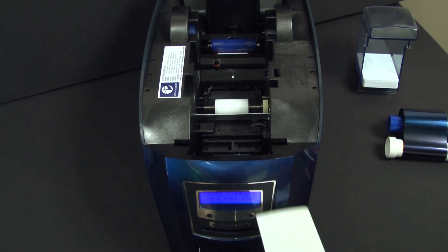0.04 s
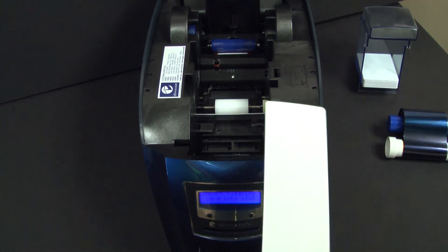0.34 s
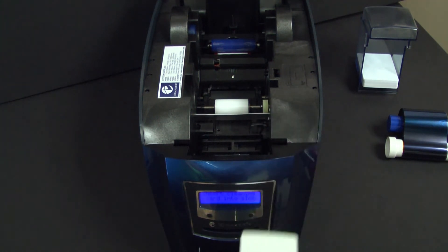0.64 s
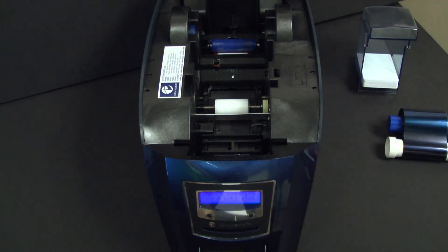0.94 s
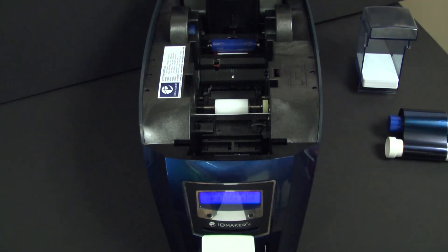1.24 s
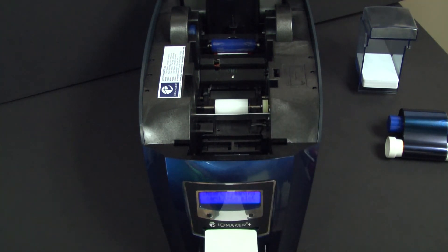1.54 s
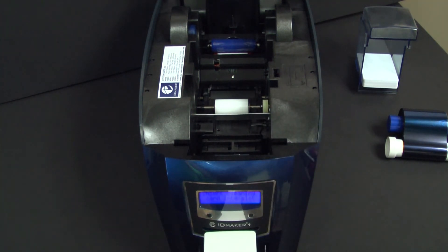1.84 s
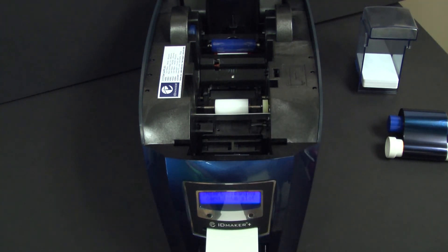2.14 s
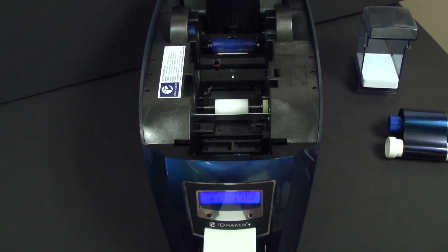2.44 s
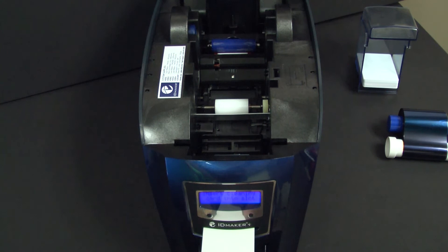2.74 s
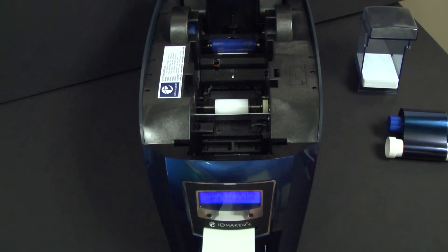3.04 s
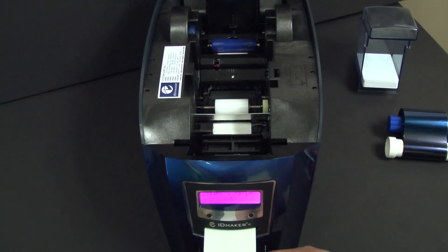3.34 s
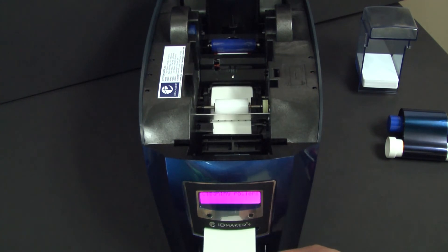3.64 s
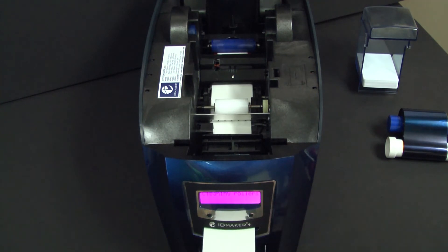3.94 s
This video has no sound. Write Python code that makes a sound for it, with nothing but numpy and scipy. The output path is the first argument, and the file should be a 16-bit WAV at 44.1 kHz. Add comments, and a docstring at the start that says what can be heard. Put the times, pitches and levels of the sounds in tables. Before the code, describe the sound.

A card printer's motor whines steadily with ticking gears, then pulls a card through.

```python
"""A steady whine sounds over a soft rattle and tick: a card printer, close by, indoors, its lid open.
The whine comes from its stepper motor, which turns in tiny quick steps; the rattle and ticks come
from plastic gears. After three seconds the rollers catch a card: it hisses along the guides,
rubs on the rubber and knocks through."""
import sys
import numpy as np
from scipy import signal
from scipy.fft import rfft, irfft
from scipy.io import wavfile
from scipy.ndimage import uniform_filter1d

SR = 44100
rng = np.random.default_rng(int(sys.argv[2]) if len(sys.argv) > 2 else 0)


def waveform_to_disk(signal):
    """Save audio, clipped to [-1, 1], as 16-bit WAV at the path in sys.argv[1]."""
    frames = np.transpose(np.atleast_2d(signal))
    scaled = np.clip(frames, -1, 1) * 32767
    samples = np.round(scaled).astype(np.int16)
    wavfile.write(sys.argv[1], SR, samples)


N = 176400
T = np.arange(N) / SR

DRIVE_HZ, CYCLES_PER_TURN = 327.33, 50  # the motor's drive cycles: per second, per turn of its rotor
ROTOR_HZ, ROLLER_HZ = DRIVE_HZ / CYCLES_PER_TURN, 3.43  # turns per second
# dip shared by three high overtones as the card enters (t/s, change/dB)
ENTRY_DIP = [(3.06, 0), (3.18, -5), (3.6, 0)]


def motor():
    """The stepping motor sings at multiples of its drive rate: returns a loud whine and a faint buzz."""
    # the two loud tones, at 4 and 8 times the drive rate (t/s, level/dB)
    low_whine = [(0, -49), (1.2, -47.5), (2.4, -47), (3.15, -46.5), (3.48, -48), (3.52, -50.5),
                 (3.7, -48.5), (4, -51.5)]
    high_whine = [(0, -44.5), (.5, -45), (1.25, -44), (2.2, -44), (3.1, -45.5), (3.49, -46), (3.53, -47.5),
                  (3.75, -47), (4, -44)]
    # the fainter overtones (multiple, level running free/dB, level pulling the card/dB)
    overtones = [(2, -65, -65), (3, -77.5, -74), (5, -75, -74), (6, -68.5, -73.5), (12, -69, -80),
                 (13, -83.5, -75), (14, -79.5, -82), (16, -70, -67), (17, -84, -89), (18, -91, -84),
                 (20, -85, -83), (23, -84.5, -84), (24, -85.5, -88), (28, -80, -79.5), (30, -89.5, -87),
                 (31, -89, -91), (34, -87.5, -86), (35, -89.5, -92), (37, -86, -91), (39, -83.5, -85),
                 (40, -83, -85), (41, -78, -77), (42, -87.5, -88), (43, -78.5, -84), (45, -88, -88),
                 (46, -88, -87), (47, -90, -89)]
    # how the strong overtones wobble (multiple, roller swing/dB, roller peak t/s,
    # swing once per rotor turn/dB, swing twice per turn/dB, rotor peak t/s, random swing/dB)
    swings = [(2, 0.5, 0.24, .5, 2.5, 0.069, 0.8), (4, 1.03, 0.28, -0.13, 0.3, 0.056, 0.48),
              (6, 0.5, .03, 0, 1.3, 0.059, 1.5), (8, 0.33, .063, 0, .5, 0.075, 0.19),
              (12, .5, 0.29, -0.2, .9, .061, 1.4), (16, 1.5, 0.23, 1.7, 2.4, 0.0059, 1.7)]
    # overtones that slowly swell and fade: multiple -> (t/s, change/dB)
    swells = {6: [(.6, -7), (1.4, 1.5)], 12: [(1.2, 1.5), (2, -2.5), (2.5, .5)], 16: [(2.1, 0), (3.2, -4.5),
              (3.45, 1)], 28: ENTRY_DIP, 41: ENTRY_DIP, 43: ENTRY_DIP, 45: [(3.05, 0), (3.33, 8),
              (3.6, -1)]}
    cycles = DRIVE_HZ * T + .0012 * drift(25)  # slightly uneven steps
    load_start_s, load_rise_s, steadying = 3, 0.46, 0.72  # pulling the card calms the wobble
    load = np.clip((T - load_start_s) / load_rise_s, 0, 1)
    wobbles = {round(k): wobble(*swing) ** (1 - steadying * load) for k, *swing in swings}

    def overtone(multiple):
        """One pure tone whose loudness wavers."""
        swell = amp(curve(swells[multiple])) if multiple in swells else 1
        waver = wobbles[multiple] if multiple in wobbles else amp(1.34 * drift(10))
        return np.sqrt(2) * swell * waver * np.sin(2 * np.pi * (multiple * cycles + rng.random()))

    whine = amp(curve(low_whine)) * overtone(4) + amp(curve(high_whine)) * overtone(8)
    buzz = np.zeros(N)
    for multiple, free_db, pulling_db in overtones:
        gain = amp(free_db) + (amp(pulling_db) - amp(free_db)) * load
        buzz += gain * overtone(round(multiple))
    return whine, buzz


def wobble(roller_db, roller_peak_s, once_db, twice_db, rotor_peak_s, random_db):
    """Loudness swings with each turn of the roller and the rotor, and a little at random."""
    rotor = 2 * np.pi * ROTOR_HZ * (T - rotor_peak_s)
    roller = 2 * np.pi * ROLLER_HZ * (T - roller_peak_s)
    turning_db = roller_db * np.cos(roller) + once_db * np.cos(rotor) + twice_db * np.cos(2 * rotor)
    return amp(turning_db + random_db * drift(14))


def card_slide():
    """The sliding card makes a grainy hiss while the rollers pulling it rumble."""
    # loudness of the hiss and of the rumble (t/s, level/dB)
    hiss_levels = [(3.055, -83), (3.08, -62.5), (3.25, -59.5), (3.46, -57.5), (3.7, -59.5), (3.85, -57.5),
                   (4, -57.5)]
    rumble_levels = [(3.05, -88), (3.3, -65), (3.39, -62), (3.42, -55.5), (3.55, -60.5), (3.61, -60.5),
                     (3.76, -66), (3.86, -56.5), (4, -57.5)]
    # tone colour of each (f/Hz, level/dB)
    hiss_colour = [(500, -17), (1500, -6.5), (2800, -3.5), (3600, -3.5), (4350, 1), (5100, -7.5),
                   (6500, -11.5), (7500, -10.5), (8100, -18), (8500, -9), (9200, -20.5), (10400, -14.5),
                   (11400, -23), (12800, -18), (15500, -24)]
    rumble_colour = [(45, -21), (110, -0.5), (180, -1.5), (300, 4.5), (420, 3.5), (540, -4.5), (740, 2.5),
                     (900, 1), (1150, -1), (1700, -2.5), (2400, -7), (4000, -25)]
    grain_gain, grains_per_s = 0.53, 900
    grains = unit(rng.standard_normal(N) * (rng.random(N) < grains_per_s / SR))
    hiss = amp(curve(hiss_levels)) * colour(rng.standard_normal(N) + grain_gain * grains, hiss_colour)
    rumble = amp(curve(rumble_levels)) * colour(rng.standard_normal(N), rumble_colour)
    return hiss + rumble


def rubber_grip(start_s=3.385, length_s=.13, from_hz=170, to_hz=108, level_db=-61, octave_db=-4):
    """Rubber rubs as it grips the card: a short, shaky tone that falls in pitch."""
    progress = np.clip((T - start_s) / length_s, 0, 1)
    hz = (from_hz + (to_hz - from_hz) * progress) * (1 + .04 * drift(60))
    phase = 2 * np.pi * np.cumsum(hz) / SR
    swell = amp(level_db) * np.sqrt(2) * np.sin(np.pi * progress ** 0.6)
    return swell * (np.sin(phase) + amp(octave_db) * np.sin(2 * phase))


def card_knocks(rise_s=0.0018):
    """The card's edge hits rollers and guides: each time a clack, a short ring and a bright click."""
    # the hits (t/s, clack level/dB, ring f/Hz, ring level/dB, click level/dB)
    hits = [(3.082, -59, 3500, -63, -60), (3.252, -58, 1020, -50, -60), (3.326, -63, 5900, -60, -57),
            (3.406, -47.5, 340, -52, -63), (3.488, -48, 1594, -43, -66), (3.494, -55, 745, -46.5, -73),
            (3.533, -52.5, 1800, -48.5, -69), (3.965, -45, 1556, -39, -48), (3.98, -46, 1740, -46, -54)]
    # tone colour of the clack and of the click (f/Hz, level/dB)
    clack_colour = [(100, -7), (350, -6), (800, 0.5), (1700, -3), (3500, -2.5), (5000, -9), (9000, -35)]
    click_colour = [(1000, -20), (4000, 2.5), (7000, -1.5), (11000, -8.5), (15500, -18)]
    out = np.zeros(N)
    ring_shape = strike(rise_s, fade_s=0.083)
    for start_s, clack_db, ring_hz, ring_db, click_db in hits:
        ring = ring_shape * np.sin(2 * np.pi * ring_hz * T[:len(ring_shape)])
        add(out, start_s, amp(clack_db) * burst(clack_colour, rise_s, fade_s=0.095))
        add(out, start_s, amp(ring_db) * ring)
        add(out, start_s, amp(click_db) * burst(click_colour, rise_s, fade_s=.09))
    return out


def gear_ticks(rebound_s=.018, boost_db=2.1):
    """Gear teeth catch, then bounce back through the gap between them, so each tick is double."""
    # the catches (t/s, level before the boost/dB, change on the rebound/dB, ring f/Hz)
    catches = [(.18, -59, -6, 1100), (.279, -52, -6, 996), (.587, -50, -11, 1960), (.79, -54, -2, 1900),
               (.894, -56, -5, 1095), (1.095, -57, 3, 1120), (1.195, -51.5, -2.5, 1080),
               (1.405, -55, -2, 1040), (1.504, -54.5, -11, 1970), (1.705, -54.5, -3, 1060),
               (1.806, -51, -4, 1970), (2.009, -54, -1, 1050), (2.112, -51.5, -1.5, 1880),
               (2.314, -54, 3, 1097), (2.417, -55, -6, 1080), (2.621, -55, -8, 1900),
               (2.928, -53, -6, 1950), (3.084, -51.5, -11, 1050), (3.251, -50.5, -15, 2950),
               (3.542, -55, 0, 990), (3.832, -56, -1, 1080)]
    out = np.zeros(N)
    for start_s, db, rebound_db, ring_hz in catches:
        add(out, start_s, amp(db) * tooth_tick(ring_hz))
        add(out, start_s + rebound_s, amp(db + rebound_db) * tooth_tick(ring_hz))
    return amp(boost_db) * out


def tooth_tick(ring_hz, ring_db=-6, chatter_db=0.5, rise_s=0.00055):
    """One plastic tooth chatters against its neighbour: a dry, uneven clack with a short ring."""
    # tone colour of the clack (f/Hz, level/dB)
    clack_colour = [(200, -14), (600, -13), (1050, 4), (1450, -3), (1900, 1), (2400, 1), (3200, 0),
                    (4300, -10.5), (5500, -14.5), (8000, -33), (15000, -35)]
    shape = strike(rise_s, fade_s=0.058)
    ring = amp(ring_db) * np.sqrt(2) * shape * np.sin(2 * np.pi * ring_hz * T[:len(shape)])
    unevenness = unit(uniform_filter1d(rng.standard_normal(len(shape)), size=70))
    chatter = unit(amp(chatter_db * unevenness))
    return chatter * burst(clack_colour, rise_s, fade_s=0.059) + ring


def gear_rattle(rattle_db=-61.5, flutter_db=0.5, random_db=2.5):
    """Running gears make a fluttering rattle and shake the case, over the low hum of the drive."""
    # tone colour of the rattle (f/Hz, level/dB)
    rattle_colour = [(30, 4), (48, -2), (70, 4), (100, -3.5), (200, -2.5), (290, 0.5), (460, -0.5),
                     (520, -10.5), (590, -13), (760, 1), (900, -4.5), (1100, 0.5), (1500, -5.5),
                     (2100, -6.5), (2700, -6.5), (3400, -11.5), (3750, -13.5), (5000, -12.5), (5600, -17.5),
                     (7000, -22.5), (10000, -24), (15500, -33.5)]
    # pitches at which the case rings (f/Hz, width/Hz, level/dB)
    case_rings = [(389, 30, -70), (437, 27, -72.5), (669, 52, -68), (1299, 56, -69.5), (2620, 55, -68)]
    # steady tones of the hum; the close ones beat against each other (f/Hz, level/dB)
    hum_tones = [(118.4, -79), (392.8, -71.5), (396.3, -75), (402.3, -80.5)]
    twice_per_turn = np.cos(4 * np.pi * ROTOR_HZ * T)
    flutter = amp(flutter_db * twice_per_turn + random_db * drift(30))
    rattle = amp(rattle_db) * colour(rng.standard_normal(N) * (1 + flutter), rattle_colour)
    case = sum(amp(db) * band(hz, width) for hz, width, db in case_rings) * unit(flutter)
    hum = sum(amp(db) * np.sqrt(2) * np.sin(2 * np.pi * (hz * T + rng.random())) for hz, db in hum_tones)
    return rattle + case + hum


def airy_hiss():
    """A very faint, high hiss in the background."""
    return amp(-91.2) * band(hz=4700, width_hz=450)


def amp(db):
    """Turns decibels into a factor to multiply by."""
    return 10 ** (np.asarray(db) / 20)


def unit(x):
    """Scales a signal to an average strength (rms) of 1."""
    return x / np.sqrt(np.mean(x ** 2) + 1e-20)


def curve(points):
    """Joins (t/s, value) points with straight lines."""
    return np.interp(T, *np.transpose(points))


def add(mix, start_s, sound):
    """Adds a sound to the mix at the given time."""
    part = mix[round(start_s * SR):][:len(sound)]
    part += sound[:len(part)]


def colour(x, points):
    """Balances the lows and highs of x by (f/Hz, level/dB) points, then scales it to strength 1."""
    hz, db = np.transpose(points)
    f = np.fft.rfftfreq(len(x), 1 / SR)
    gain = amp(np.interp(np.log(f + 1), np.log(hz), db))
    return unit(irfft(rfft(x) * gain, len(x)))


def band(hz, width_hz):
    """Noise gathered around one pitch, at strength 1."""
    f = np.fft.rfftfreq(N, 1 / SR)
    falloff = 1 + ((f - hz) / (.75 * width_hz)) ** 2
    return unit(irfft(rfft(rng.standard_normal(N)) / falloff, N))


def drift(rate_hz, points=1024):
    """Smooth random wandering around zero, mostly slower than rate_hz."""
    f = np.fft.rfftfreq(points, N / SR / points)
    spectrum = rfft(rng.standard_normal(points)) * (f > 0)
    slow = unit(irfft(spectrum / (1 + (f / rate_hz) ** 2)))
    return np.interp(T, np.linspace(0, N / SR, points), slow)


def strike(rise_s, fade_s):
    """Loudness of a blow: it rises quickly and dies away by 60 dB every fade_s."""
    t = T[:SR // 4]
    return np.minimum(t / rise_s, 1) * np.exp(-np.log(1000) * t / fade_s)


def burst(points, rise_s, fade_s):
    """Struck plastic rings at so many close pitches that it sounds like a puff of noise."""
    shape = strike(rise_s, fade_s)
    return shape * colour(rng.standard_normal(len(shape)), points)


def scene():
    """The printer stands ahead, almost the same in both ears, a shade louder on the right."""
    # sideways lean of all but the whine and airy hiss (f/Hz, left change/dB); the right gets the opposite
    lean = [(100, -0.25), (700, -0.33), (1700, -0.13), (4500, -0.32), (7000, -.03)]
    side = np.array([[1], [-1]])  # left, right
    whine, buzz = motor()
    body = buzz + gear_rattle() + gear_ticks() + card_slide() + rubber_grip() + card_knocks()
    lean_db = np.interp(np.fft.rfftfreq(N, 1 / SR), *np.transpose(lean))
    stereo_body = irfft(rfft(body) * amp(lean_db * side), N)
    return whine * amp(-0.24 * side) + stereo_body + airy_hiss() * side


def record(dry, cutoff_hz=15720):
    """Cuts away the very highest treble."""
    lowpass = signal.firwin(801, cutoff_hz, window=("kaiser", 9), fs=SR)
    return signal.oaconvolve(dry, lowpass[None], "same")


dry = scene()
out = record(dry)
waveform_to_disk(out)
```